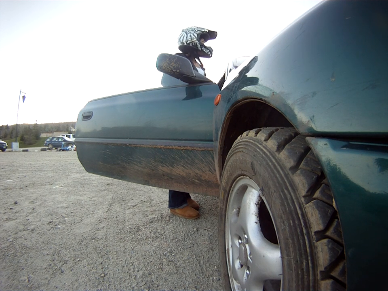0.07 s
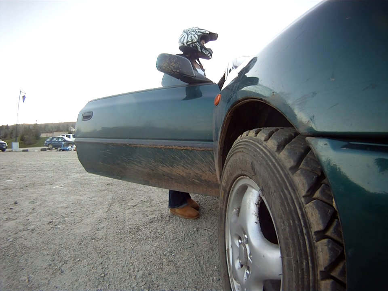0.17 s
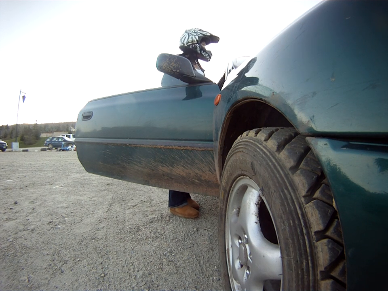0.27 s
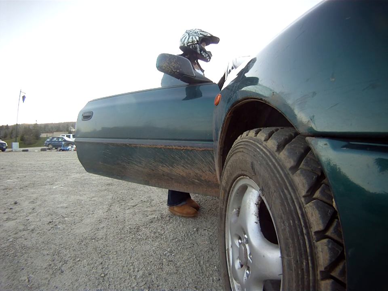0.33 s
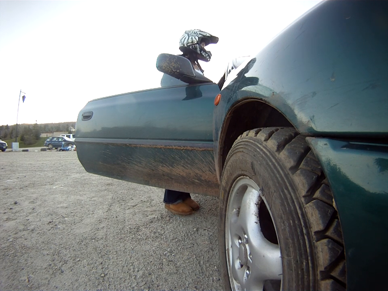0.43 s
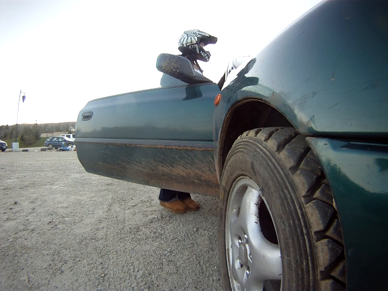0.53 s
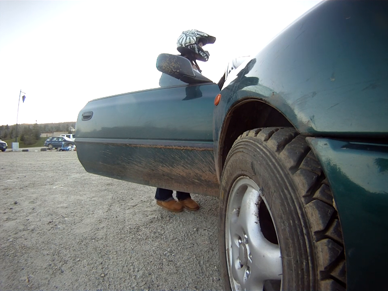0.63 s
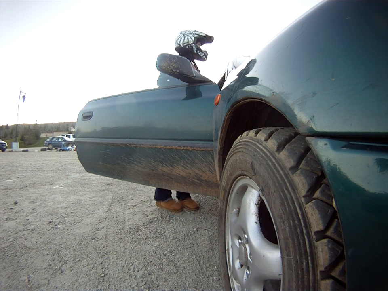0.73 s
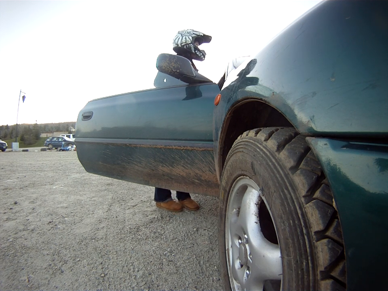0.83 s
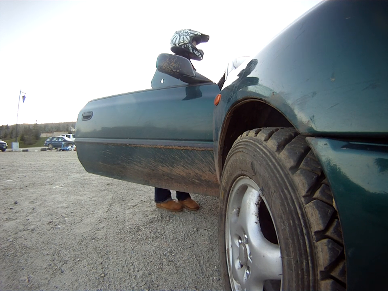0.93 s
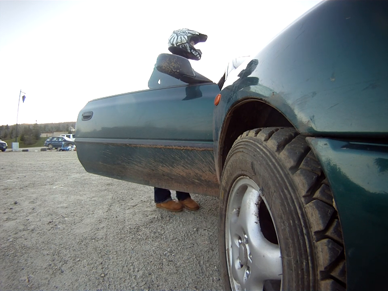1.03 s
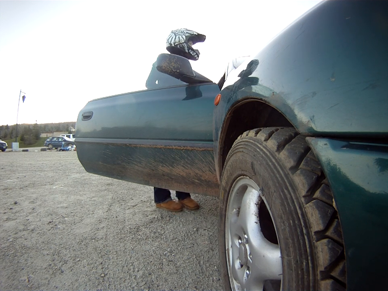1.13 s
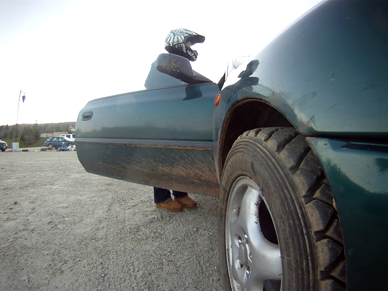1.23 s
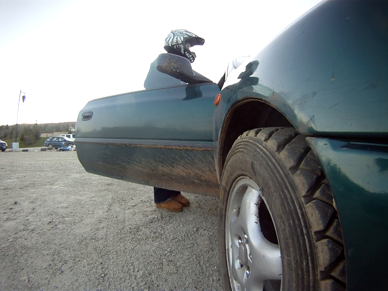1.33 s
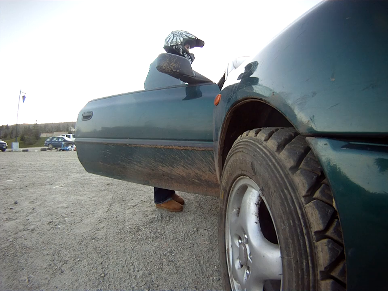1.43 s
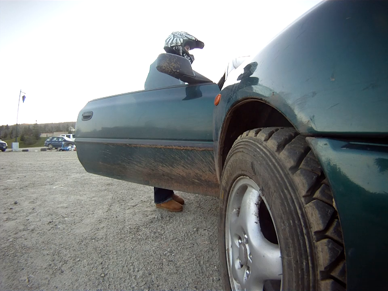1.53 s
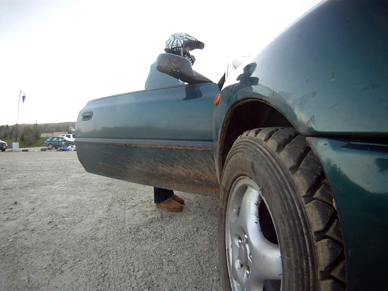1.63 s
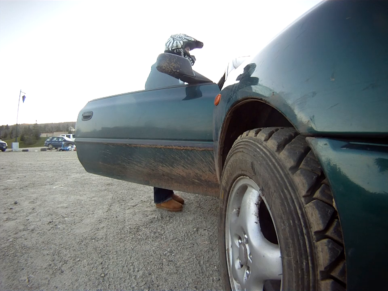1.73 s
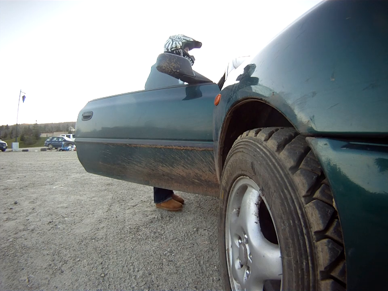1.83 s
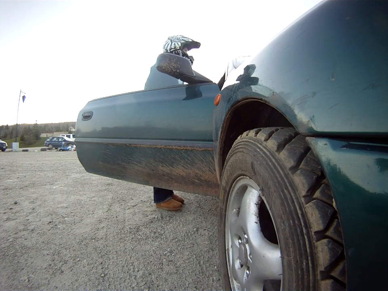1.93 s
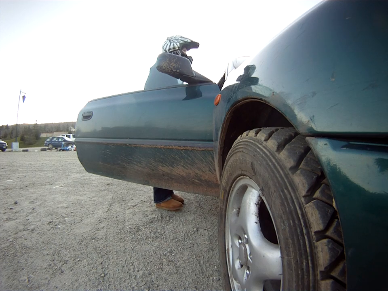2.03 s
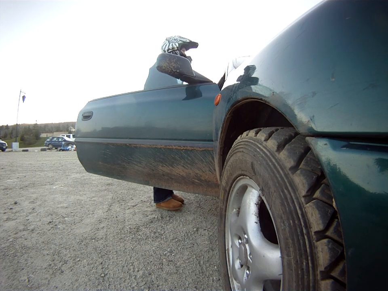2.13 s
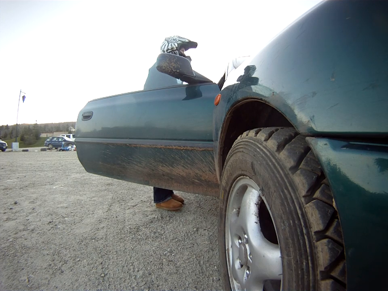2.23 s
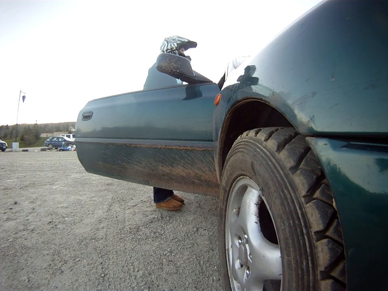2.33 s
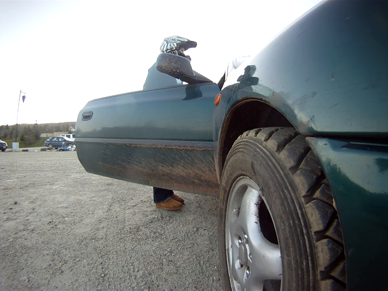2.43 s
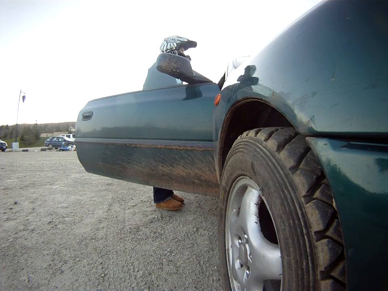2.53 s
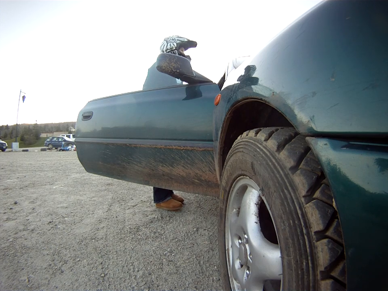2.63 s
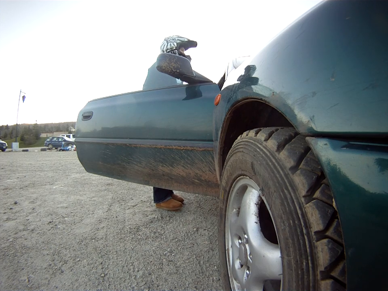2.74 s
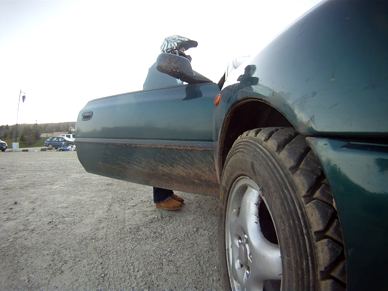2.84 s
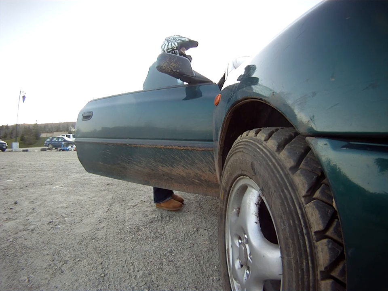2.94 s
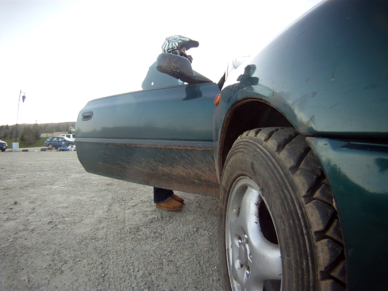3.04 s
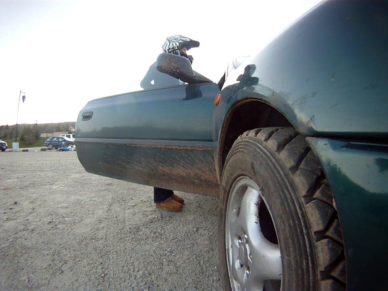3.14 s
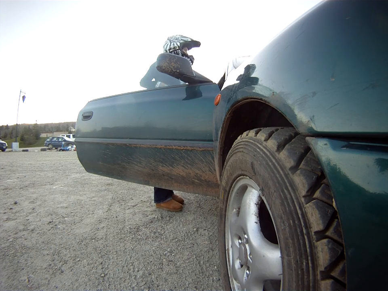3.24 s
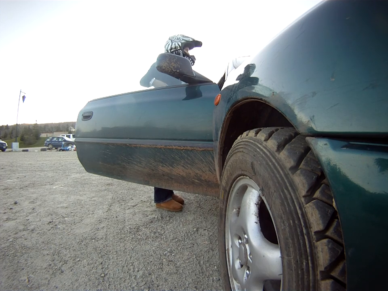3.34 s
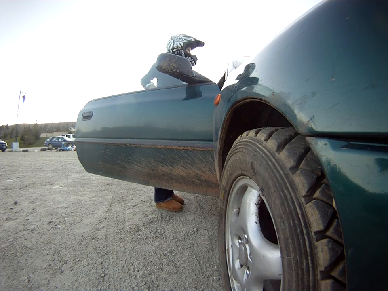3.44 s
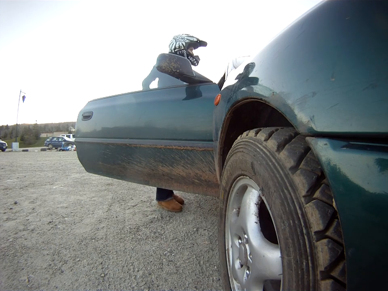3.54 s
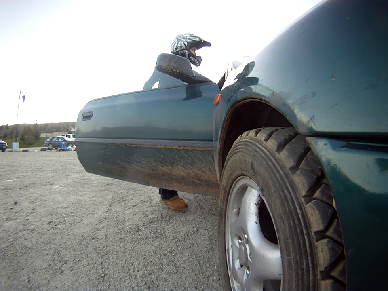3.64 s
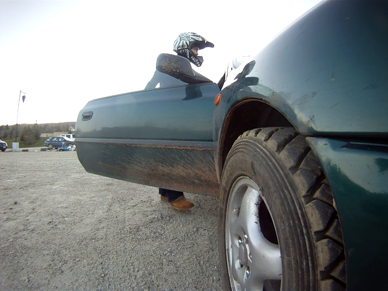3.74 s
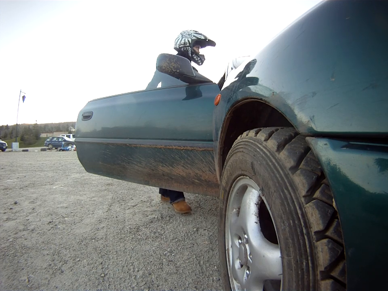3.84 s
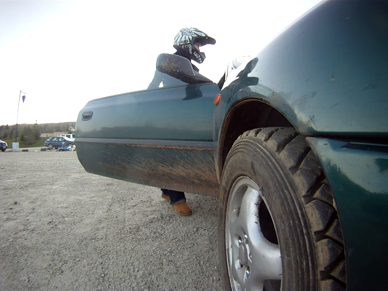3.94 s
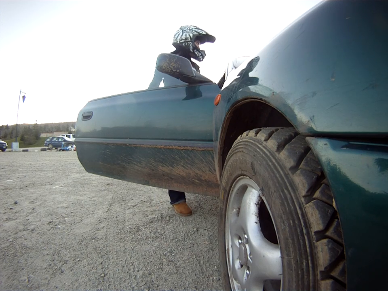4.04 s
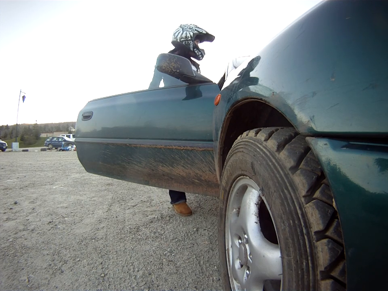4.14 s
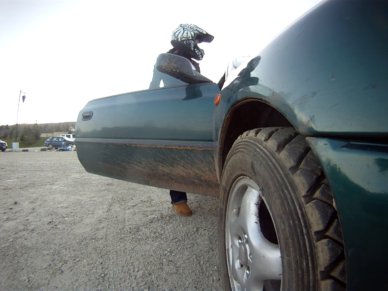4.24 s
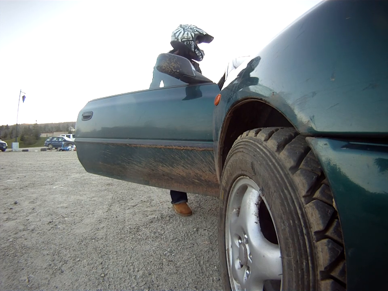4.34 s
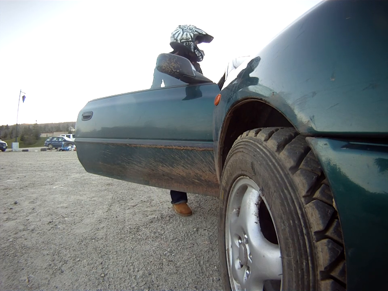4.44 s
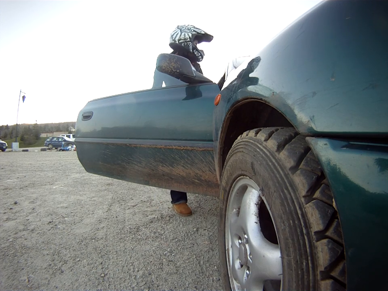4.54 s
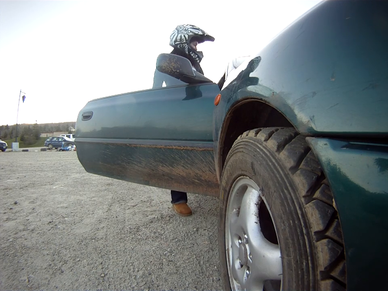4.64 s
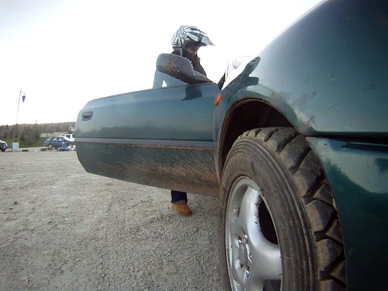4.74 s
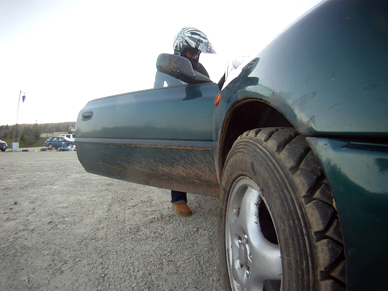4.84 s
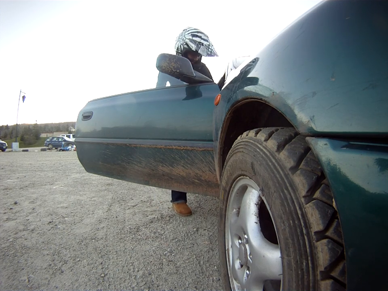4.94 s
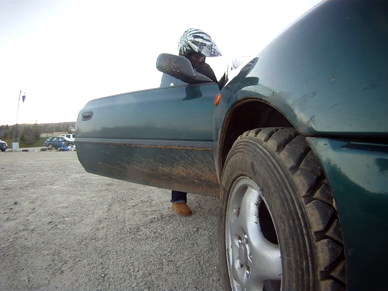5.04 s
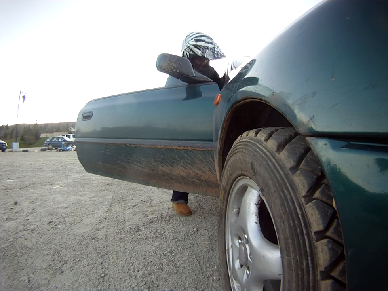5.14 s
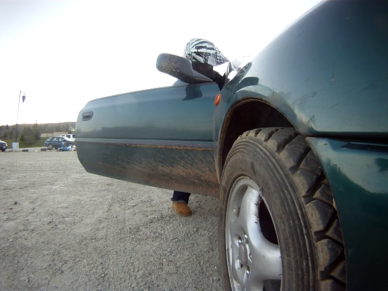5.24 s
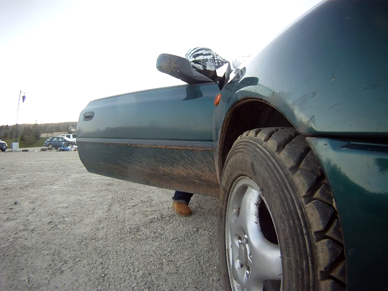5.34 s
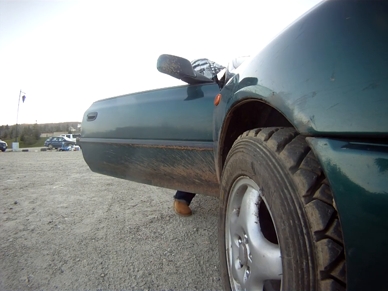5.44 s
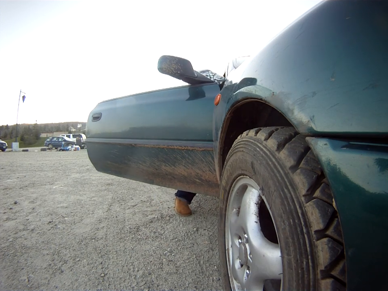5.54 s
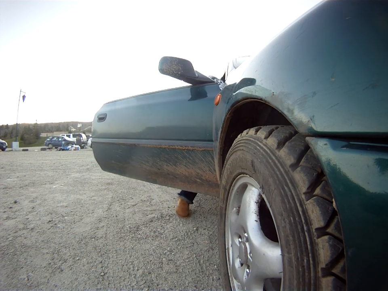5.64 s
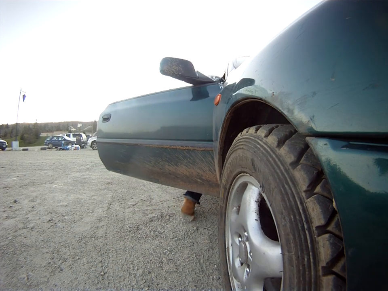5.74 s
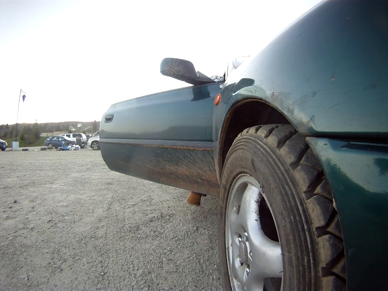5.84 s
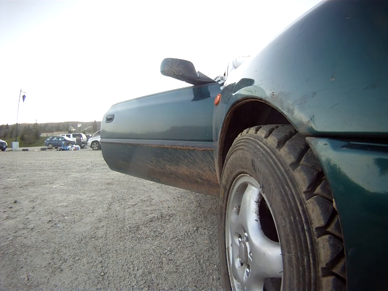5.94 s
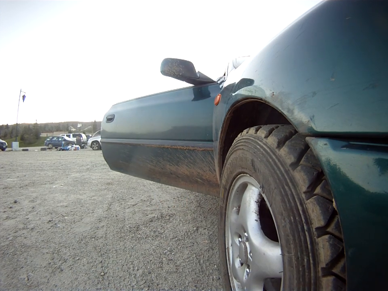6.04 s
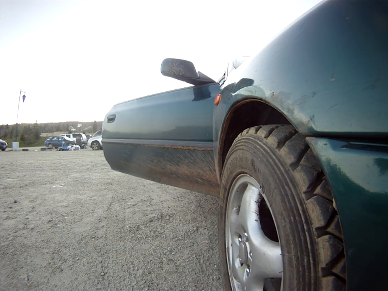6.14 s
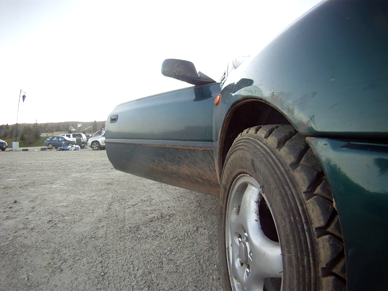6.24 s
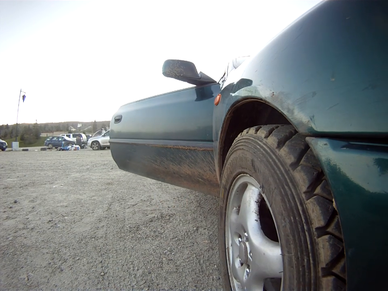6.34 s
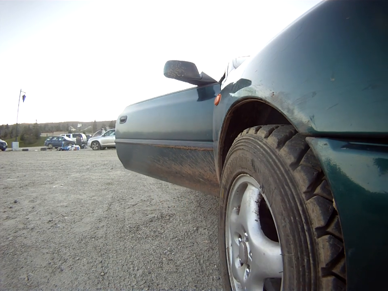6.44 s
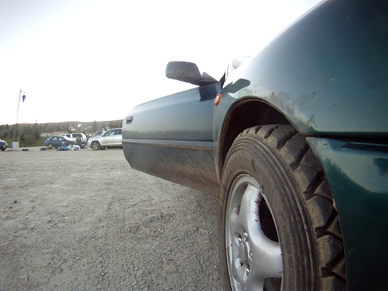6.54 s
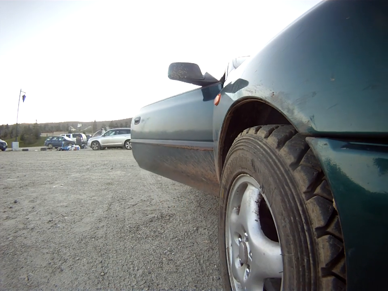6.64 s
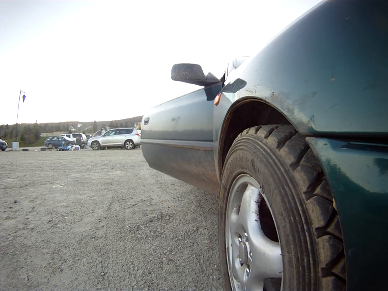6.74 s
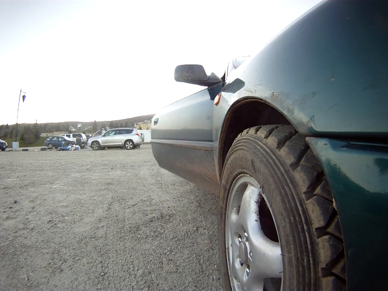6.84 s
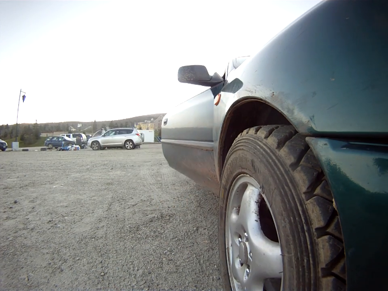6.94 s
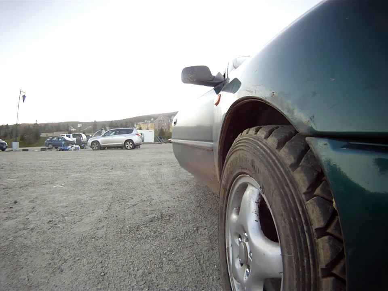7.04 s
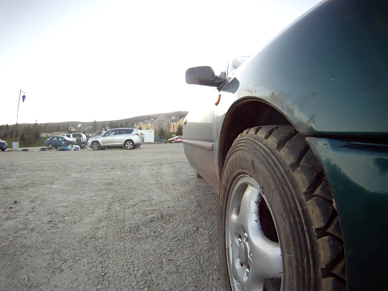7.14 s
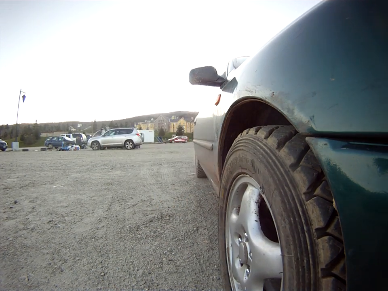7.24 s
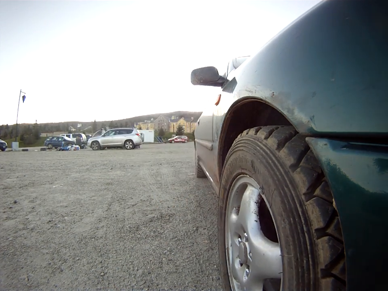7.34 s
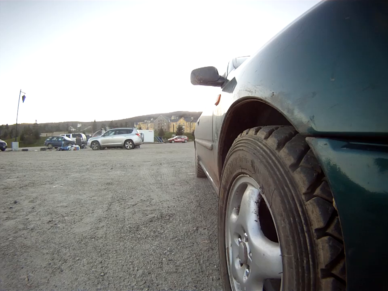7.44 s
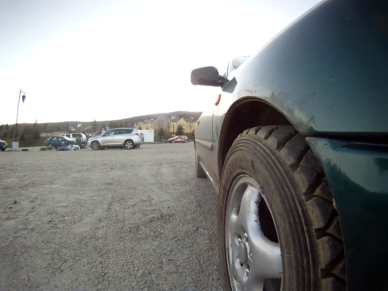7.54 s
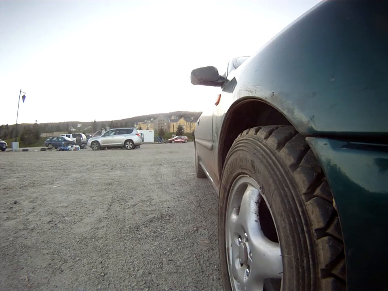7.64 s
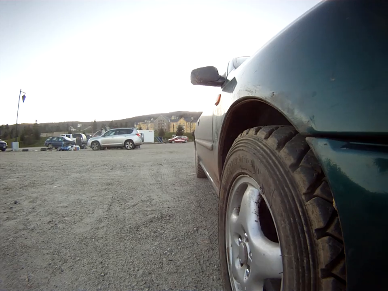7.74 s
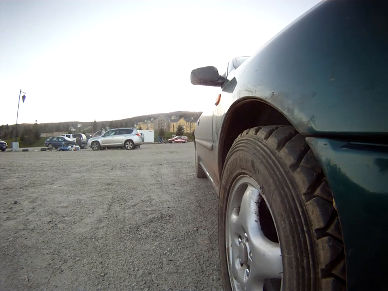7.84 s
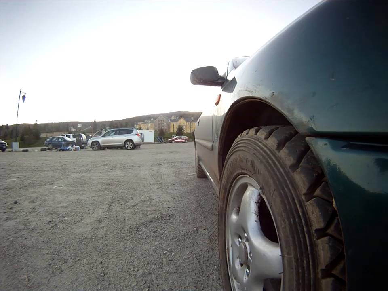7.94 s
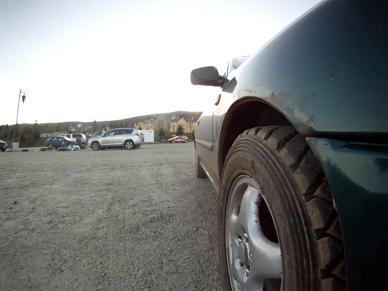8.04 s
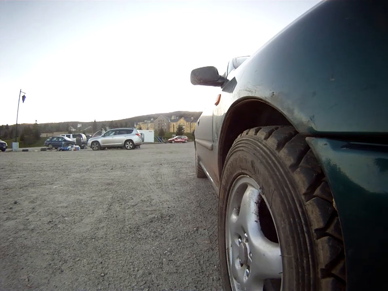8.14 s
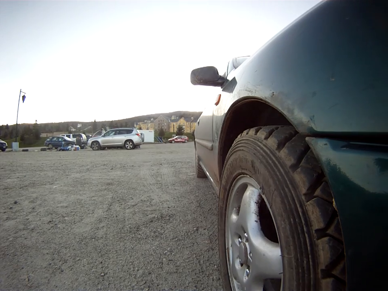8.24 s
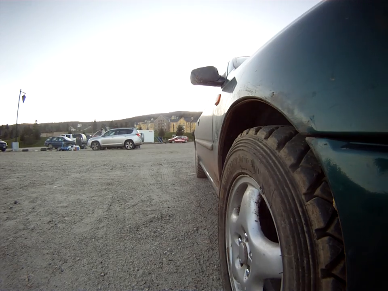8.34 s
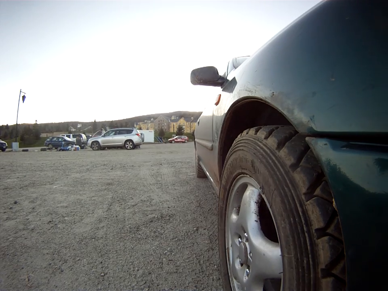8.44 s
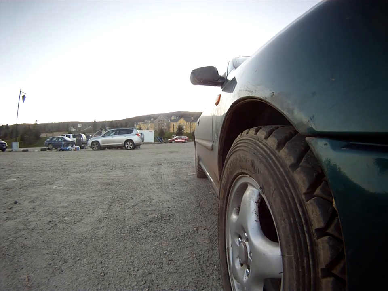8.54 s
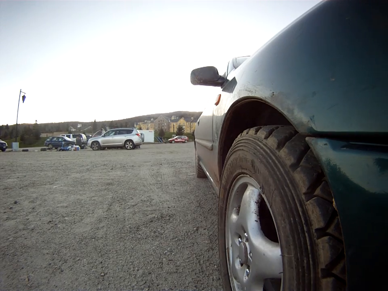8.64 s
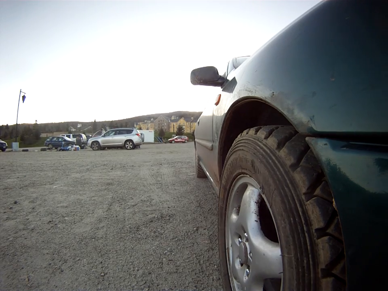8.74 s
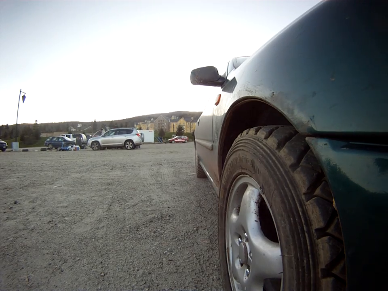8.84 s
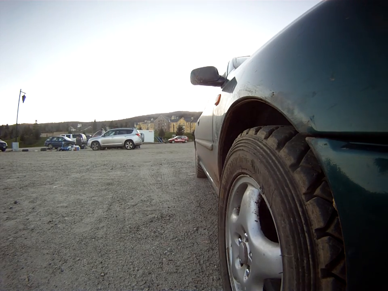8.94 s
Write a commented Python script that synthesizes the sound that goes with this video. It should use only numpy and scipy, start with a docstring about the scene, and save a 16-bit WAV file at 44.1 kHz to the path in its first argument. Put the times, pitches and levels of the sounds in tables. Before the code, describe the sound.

A car engine idles with a low hum and soft whir on a gravel lot, while another engine revs far off in light wind. Boots scuff faintly on the stones, then soft knocks and a hollow thump come as the driver climbs in. The door slams with a deep boom, a latch snap and a brief rattle, and the idle carries on. A small microphone sits by the front wheel.

```python
"""A car engine idles on a gravel lot, its periodic firing heard as low tones, a whir and exhaust rumble.
Another engine revs far off in light wind. The driver's boots and clothes make friction noise, and the
car rocks as the driver climbs in. The door slams: the impact excites the body's modes in a boom, with
a panel crunch, a latch snap and a few rattles. A small camera by the front wheel picks it all up;
its plastic case colours the whir, and its sampling mirrors the sound into the treble."""
import sys
import numpy as np
from scipy import signal
from scipy.fft import rfft, irfft
from scipy.io import wavfile
from scipy.ndimage import uniform_filter1d

SR = 44100
rng = np.random.default_rng(int(sys.argv[2]) if len(sys.argv) > 2 else 0)


def digitize_waveform(pressure):
    """Quantize a signal to 16-bit integers and store it at the path in sys.argv[1].

    Rows of a 2-D input are taken as channels; values are limited to [-1, 1].
    """
    field = np.atleast_2d(pressure).T
    bounded = np.clip(field, -1, 1)
    quanta = np.round(bounded * 32767).astype(np.int16)
    wavfile.write(sys.argv[1], SR, quanta)


N = 396018
TIME = np.arange(N) / SR
FREQS = np.fft.rfftfreq(N, 1 / SR)


def gain_of(db):
    """Decibels to amplitude ratio."""
    return 10 ** (np.asarray(db) / 20)


def unit_rms(x):
    """Normalisation to rms 1."""
    return x / np.sqrt(np.mean(x ** 2) + 1e-20)


def add(mix, start_s, sound):
    """Superposition: a sound adds to the mix from start_s on."""
    part = mix[round(start_s * SR):][:len(sound)]
    part += sound[:len(part)]


def wander(rate_hz):
    """Random modulation: noise of rms 1, low-passed at rate_hz."""
    knots = np.arange(0, TIME[-1] + 1, 1 / 200)
    lowpass = 1 / (1 + (np.fft.rfftfreq(len(knots), knots[1]) / rate_hz) ** 4)
    slow = irfft(rfft(rng.standard_normal(len(knots))) * lowpass, len(knots))
    return unit_rms(np.interp(TIME, knots, slow))


def resonate(x, modes, size=4096):
    """Resonance: x drives damped modes, as a minimum-phase filter of unit energy."""
    freqs = abs(np.fft.fftfreq(size, 1 / SR))
    power = sum(gain_of(db) ** 2 / (1 + (2 * (freqs - hz) / width) ** 2) ** 2 for hz, width, db in modes)
    log_spectrum = signal.hilbert(np.log(power + 1e-12) / 2).conj()
    response = np.fft.ifft(np.exp(log_spectrum)).real[:size // 2]
    return signal.oaconvolve(x, response / np.linalg.norm(response))[:N]


def bursts(contacts, attack_s):
    """Contact noise: each blow or rub is a burst with exponential rise and decay."""
    envelope, t = np.zeros(N), TIME[:SR // 2]
    for start_s, level_db, decay_s in contacts:
        add(envelope, start_s, gain_of(level_db) * (1 - np.exp(-t / attack_s)) * np.exp(-t / decay_s))
    return envelope * rng.standard_normal(N)


# Engine orders: firing_multiple, level_db
IDLE_ORDERS = [(.5, -66), (1, -61), (1.5, -64), (2, -49), (3, -55.5), (4, -56), (5, -68.5), (6, -68.5),
               (7, -66.5), (8, -71), (14, -72.5), (19, -76), (21, -70.5), (29, -70), (30, -69.5), (32, -70),
               (34, -82), (35, -74)]
# Resonances of the camera case: centre_hz, width_hz, relative_db
CASE_MODES = [(675, 310, -10.5), (1030, 128, -0.5), (1143.4, 145, 4), (1505, 300, -8.5), (1799, 195, -5),
              (2082, 440, -8), (2512, 460, -9.5), (3116, 154, -15.5), (3590, 640, -16), (3950, 270, -39),
              (4900, 1480, -25.5)]

def idling_engine(firing_hz=33.12, lope_db=-65, whir_db=-52, throb_depth=0.062):
    """Periodic excitation: firing makes tones and modulates a whir; unequal cylinders add a lope."""
    firings = np.cumsum(firing_hz * (1 + 0.0016 * wander(2.46))) / SR
    dip_db = -12.5 * np.exp(-((TIME - 3.1) / 0.63) ** 2)  # the strongest tone sinks once
    tones = np.zeros(N)
    for order, db in IDLE_ORDERS:
        level_db = db + dip_db * (order == 2) + 1.1 * wander(5.8)
        tones += gain_of(level_db) * np.cos(2 * np.pi * (order * firings + rng.random()))
    # the four cylinders repeat once in four firings
    lope = sum(np.cos(2 * np.pi * (k / 4 * firings + rng.random())) for k in range(3, 22) if k % 4)
    pulses = sum(np.cos(2 * np.pi * k * firings) for k in range(1, 4)) / 2
    whir = gain_of(whir_db + 0.5 * wander(12)) * (1 + throb_depth * pulses) * rng.standard_normal(N)
    return np.sqrt(2) * (tones + gain_of(lope_db) * lope) + resonate(whir, CASE_MODES)


# Spectrum of exhaust and wind: frequency_hz, relative_db
RUMBLE_SPECTRUM = [(8, -8), (20, 4), (55, 2), (100, 2), (170, -10), (225, -8.5), (250, -11.5), (290, -7),
                   (335, -7), (365, -17), (600, -21), (1000, -29.5), (3000, -68)]
# Puffs of wind: peak_s, rise_db
WIND_GUSTS = [(.8, 2.5), (6.2, 0.3)]

def exhaust_and_wind(level_db=-52, gust_width_s=0.75, lumps_db=1.5):
    """Flow noise: a broadband rumble, strongest in the bass, swells in gusts and lumps."""
    hz, db = np.transpose(RUMBLE_SPECTRUM)
    spectrum = gain_of(np.interp(np.log(FREQS + 1), np.log(hz), db))
    rumble = unit_rms(irfft(rfft(rng.standard_normal(N)) * spectrum, N))
    gusts_db = sum(rise * np.exp(-((TIME - s) / gust_width_s) ** 2) for s, rise in WIND_GUSTS)
    return gain_of(level_db + gusts_db + lumps_db * wander(19)) * rumble


# Pulls of the far engine, with levels before the tilt of distance:
# start_s, length_s, from_hz, toward_hz, level_db, coast_change_db, uneven_firing_db
ENGINE_PULLS = [(.2, .85, 220, 239, -57, -7.5, -5), (2.0, 1.5, 122, 228.9, -50.5, -2.5, -22),
                (4.381, 0.79, 142, 220, -54.3, -4.5, -17), (5.6, 1.6, 190.6, 231, -58.5, -3, -16),
                (8.3, .7, 150.3, 170.3, -56, 0, -18)]

def throttle(lag_s=0.5, faint_db=-65):
    """First-order lag: each pull nears its top speed; between pulls the engine slows, more quietly."""
    pitch_points = []
    level_db, uneven_db = np.full(N, faint_db), np.full(N, ENGINE_PULLS[0][-1])
    for start_s, length_s, from_hz, toward_hz, db, coast_db, uneven in ENGINE_PULLS:
        for t in np.linspace(0, length_s, num=20):
            pitch_points.append((start_s + t, toward_hz + (from_hz - toward_hz) * np.exp(-t / lag_s)))
        level_db = np.where(TIME >= start_s, db + coast_db * (TIME > start_s + length_s), level_db)
        uneven_db = np.where(TIME >= start_s, uneven, uneven_db)
    pitch_hz = np.interp(TIME, *np.transpose(pitch_points))
    level_db, uneven_db = uniform_filter1d([level_db, uneven_db], size=SR // 2, axis=1)
    return pitch_hz, level_db, uneven_db


def far_engine(tilt_db_per_octave=-2, shaft_db=-10):
    """Attenuation with distance: low tones carry best, and they fade in and out on the wind."""
    pitch_hz, level_db, uneven_db = throttle()
    octaves = np.log2(pitch_hz / 200)
    phase = 2 * np.pi * np.cumsum(pitch_hz * (1 + 0.01095 * wander(13.1))) / SR
    shaft = gain_of(shaft_db) * np.sin(phase / 2)
    uneven = gain_of(uneven_db) * np.sin(1.5 * phase)
    overtone = gain_of(-20.5 + 14 * octaves + 3.5 * wander(12)) * np.sin(2 * phase)  # grows with revs
    envelope = gain_of(level_db + tilt_db_per_octave * octaves + 2.5 * wander(5))
    return np.sqrt(2) * envelope * (np.sin(phase) + shaft + uneven + overtone)


# Boot scuffs: start_s, level_db, decay_s
BOOT_SCUFFS = [(.39, -61.5, 0.14), (.66, -49, 0.023), (.76, -62, 0.12), (1.23, -55.5, 0.045),
               (4.47, -66, .05)]
# Resonances of gravel: centre_hz, width_hz, relative_db
STONE_MODES = [(1920, 370, -1), (2470, 430, 6), (3100, 230, 4.5), (3660, 160, 8.5), (4870, 1500, -13)]

def boots_on_gravel():
    """Friction: stones rub under a boot and ring briefly."""
    return resonate(bursts(BOOT_SCUFFS, attack_s=0.0039), STONE_MODES)


# Brushes of clothing: start_s, level_db, decay_s
CLOTH_BRUSHES = [(.4, -68, .08), (5.57, -61, .07)]
# Noise bands of cloth: centre_hz, width_hz, relative_db
CLOTH_BANDS = [(3200, 1400, -3), (5670, 1600, -7)]

def clothes():
    """Sliding friction: fabric hisses softly as the driver moves."""
    return resonate(bursts(CLOTH_BRUSHES, attack_s=0.029), CLOTH_BANDS)


# Modes of the car body: pitch_hz, level_db, build_up_s, t60_s
BODY_MODES = [(21, -20, 0.17, 0.96), (40.07, -20, 0.2, 0.66), (61.8, -13, 0.0554, 0.3),
              (69.05, -31.5, 0.21, 0.6), (85.8, -28, 0.1, 1.1), (113.2, -33, 0.044, 0.69),
              (181, -39, 0.042, 0.13), (247, -43.5, 0.043, 0.43), (277.7, -34.5, 0.048, 0.3),
              (317, -28, 0.056, 0.15), (333, -43.5, 0.11, 0.47), (402, -54, 0.048, 0.042)]

def rocking(seated_s=5.3, peak_db=-38, rise_db_per_s=21, fall_db_per_s=170):
    """Forced vibration: the driver's weight stirs the lowest mode until the seat takes the load."""
    below_peak_db = np.maximum(rise_db_per_s * (seated_s - TIME), fall_db_per_s * (TIME - seated_s))
    pitch_hz = BODY_MODES[0][0] * (1 + 0.126 * wander(7.3))
    return gain_of(peak_db - below_peak_db) * np.sqrt(2) * np.sin(2 * np.pi * np.cumsum(pitch_hz) / SR)


# Blows on the body: start_s, level_db, heavy_mode_db, build_up_factor, t60_factor
BODY_BLOWS = [(3.932, -28.5, -1, 0.46, 1), (4.479, -21, -8, 0.89, 0.86), (5.266, 0, -29, 0.52, 0.82),
              (6.139, -25, -6, .6, 1), (7.288, -2.5, 1.8, 0.98, 1.1), (8.128, -24, -5.5, 0.55, 1)]

def body_boom(heavy_below_hz=300):
    """Modal response to impact: each mode swells while the contact lasts, then decays freely."""
    boom, t = np.zeros(N), TIME[:SR]
    for start_s, level_db, heavy_mode_db, build_up_factor, t60_factor in BODY_BLOWS:
        for pitch_hz, mode_db, build_up_s, t60_s in BODY_MODES:
            contact_s = build_up_s * build_up_factor
            swell = np.sin(np.pi / 2 * np.minimum(t / contact_s, 1)) ** 2
            decay_db = -60 * np.maximum(t - contact_s, 0) / (t60_s * t60_factor)
            # a light knock rings the thin panels but hardly moves the heavy modes
            weight_db = heavy_mode_db * (pitch_hz < heavy_below_hz)
            envelope = gain_of(level_db + mode_db + weight_db + decay_db) * swell
            # panels and seals shift, so no mode holds its pitch exactly
            detune = 0.007 * np.interp(t, np.linspace(0, 1, 40), rng.standard_normal(40))
            phase = 2 * np.pi * np.cumsum(pitch_hz * (1 + detune)) / SR
            add(boom, start_s, envelope * np.sin(phase))
    return boom


# Contacts of door and frame: start_s, level_db, decay_s
DOOR_CRUNCHES = [(5.257, -43, 0.015), (7.279, -41.5, 0.01), (7.295, -44, 0.036), (7.325, -46, 0.025),
                 (7.367, -49, .004), (7.411, -38, 0.0067)]
# Resonances of the door panel: centre_hz, width_hz, relative_db
DOOR_MODES = [(370, 200, 3), (670, 170, -1.5), (840, 520, -11), (1070, 360, 0), (1500, 330, -8),
              (2380, 450, -3.5), (3570, 350, -14)]

def door_crunch():
    """Plate vibration: sheet metal and trim ring as they crunch against the frame."""
    return resonate(bursts(DOOR_CRUNCHES, attack_s=0.002), DOOR_MODES)


# Snaps of the door and its latch: start_s, level_db
LATCH_SNAPS = [(5.258, -43.5), (5.264, -49), (7.294, -37), (7.305, -38), (7.315, -47), (7.332, -45),
               (7.385, -49)]
# Resonances of the latch: centre_hz, width_hz, relative_db
METAL_MODES = [(1196, 110, 8.5), (1930, 480, -1.5), (3006, 160, 1), (3750, 320, -8), (4200, 600, -16.5),
               (5060, 460, -8), (5730, 450, -16)]

def latch(decay_s=0.0046):
    """Impulsive excitation: brief metal contacts ring the high modes of the latch."""
    snaps = [(start_s, level_db, decay_s) for start_s, level_db in LATCH_SNAPS]
    return resonate(bursts(snaps, attack_s=0.001), METAL_MODES)


# Taps of loose parts after the slam: start_s, level_db
LOOSE_TAPS = [(7.3575, -37), (7.367, -43), (7.3935, -47), (7.4125, -35), (7.417, -45), (7.442, -33),
              (7.474, -47), (7.5126, -34), (7.534, -40)]
# Resonances of the loose parts: centre_hz, width_hz, relative_db
LOOSE_MODES = [(1106, 165, 9), (1900, 280, 0), (2600, 420, 0.5), (3150, 400, -14), (3730, 200, -6.5),
               (5000, 700, -34)]

def rattles(decay_s=0.0028):
    """Repeated impact: loose parts tap and ring as the body shakes."""
    taps = [(start_s, level_db, decay_s) for start_s, level_db in LOOSE_TAPS]
    return resonate(bursts(taps, attack_s=0.00034), LOOSE_MODES)


def scene():
    """Superposition: engines, wind, driver and door sum in one channel."""
    background = idling_engine() + exhaust_and_wind() + far_engine()
    driver = boots_on_gravel() + clothes() + rocking()
    door = body_boom() + door_crunch() + latch() + rattles()
    return (background + driver + door)[None]


def record(dry, band_hz=5750, clock_hz=12000, image_db=-0.22, edge_hz=15350):
    """Spectral imaging: the camera holds each sample; the steps mirror the sound into the treble."""
    narrow = signal.oaconvolve(dry[0], signal.firwin(121, band_hz, fs=SR), "same")
    clock = 1 + 2 * gain_of(image_db) * np.cos(2 * np.pi * clock_hz * TIME)
    held = np.cumsum(np.diff(narrow, prepend=narrow[0]) * clock)  # changes bunch at the clock's ticks
    held -= held.mean()
    band_limit = signal.firwin(511, edge_hz, window=("kaiser", 9), fs=SR)
    return signal.oaconvolve(held, band_limit, "same")[None]


dry = scene()
out = record(dry)
digitize_waveform(out)
```